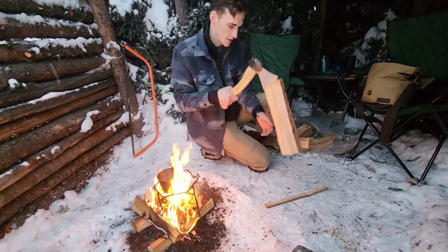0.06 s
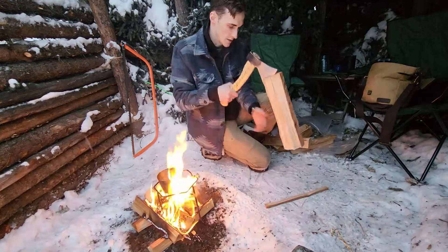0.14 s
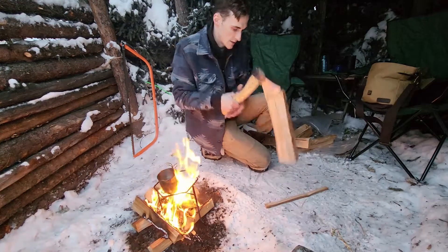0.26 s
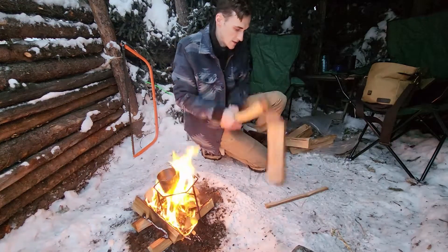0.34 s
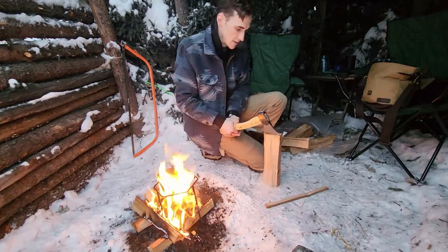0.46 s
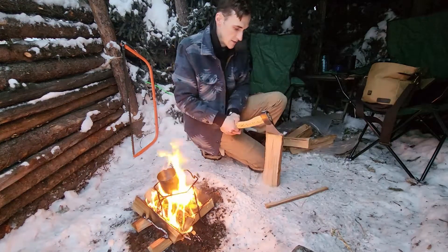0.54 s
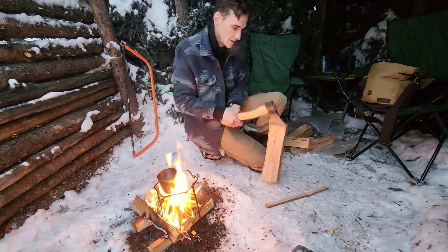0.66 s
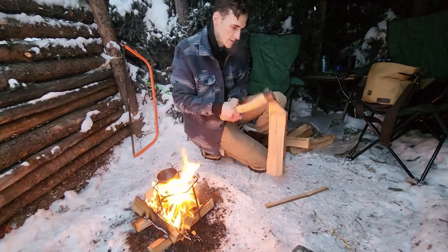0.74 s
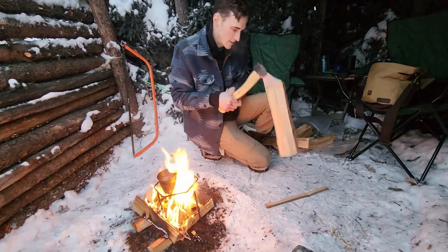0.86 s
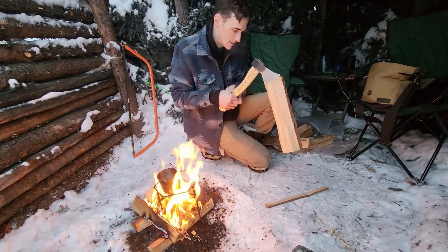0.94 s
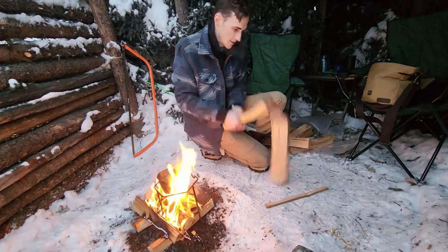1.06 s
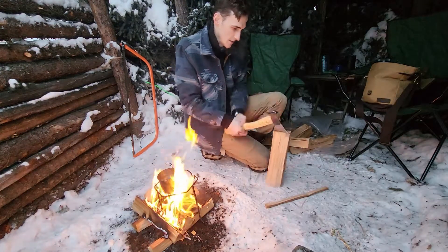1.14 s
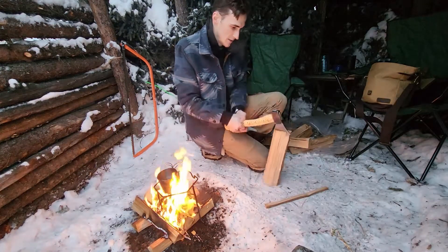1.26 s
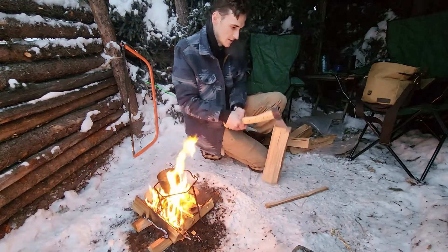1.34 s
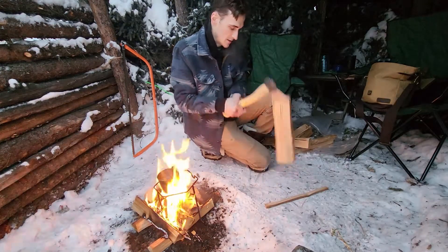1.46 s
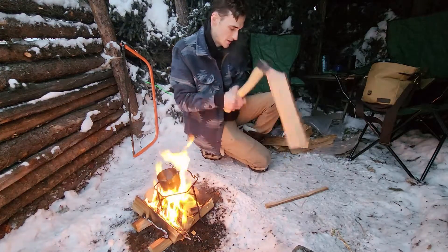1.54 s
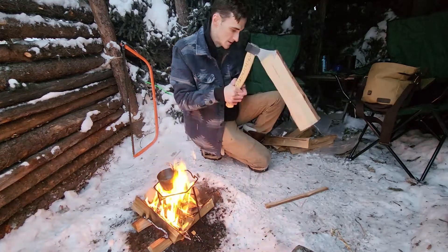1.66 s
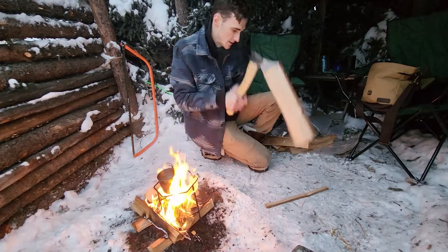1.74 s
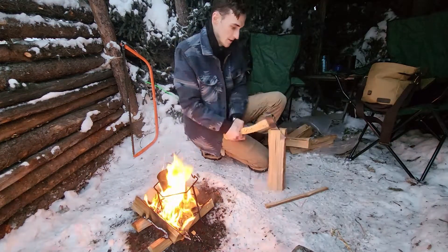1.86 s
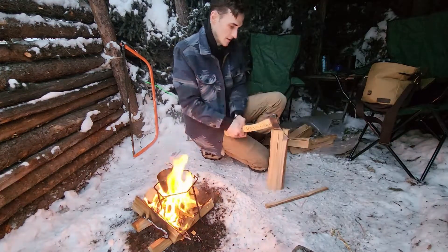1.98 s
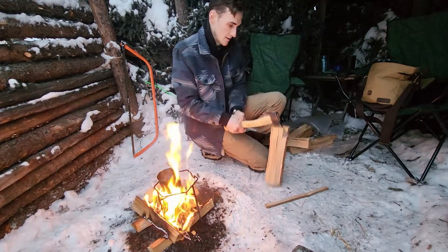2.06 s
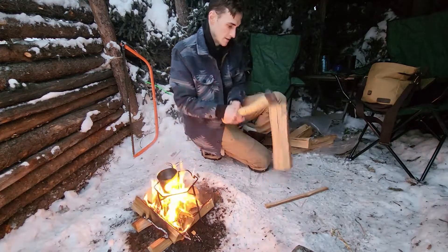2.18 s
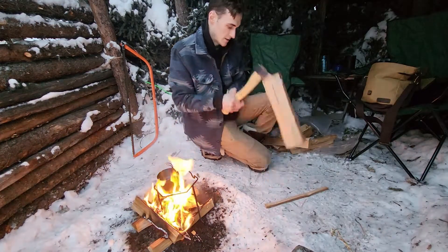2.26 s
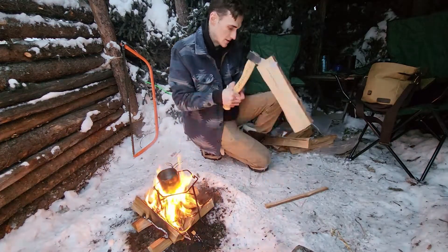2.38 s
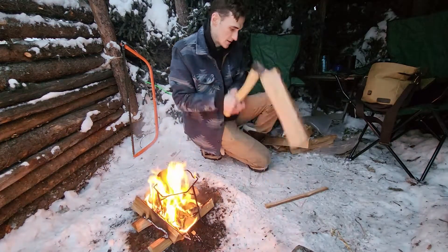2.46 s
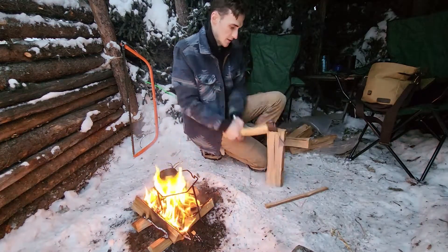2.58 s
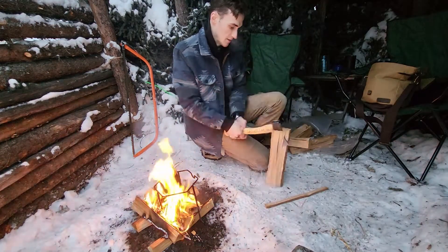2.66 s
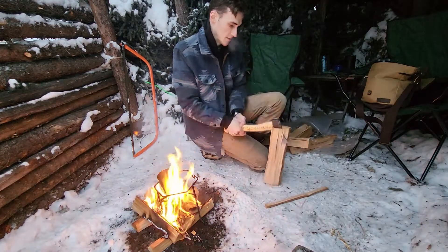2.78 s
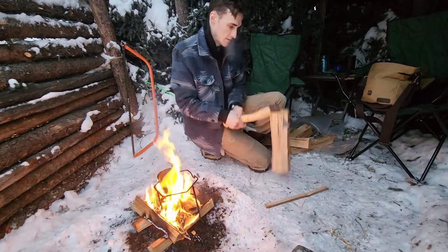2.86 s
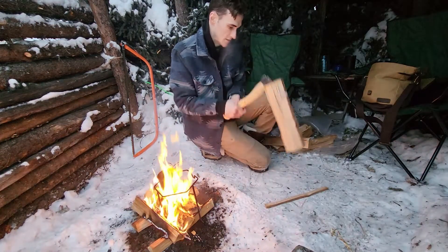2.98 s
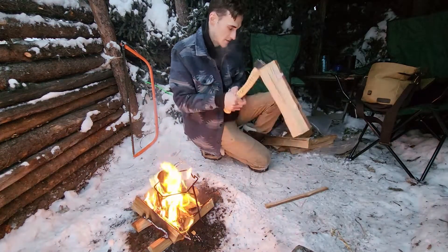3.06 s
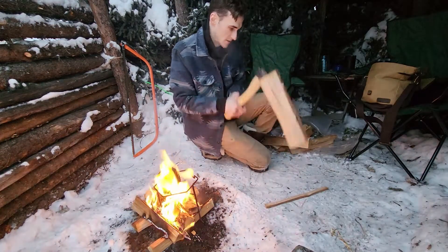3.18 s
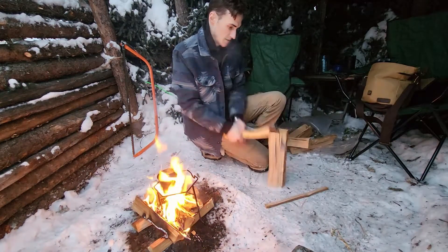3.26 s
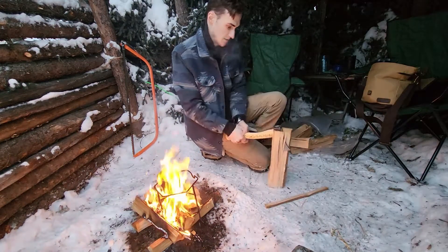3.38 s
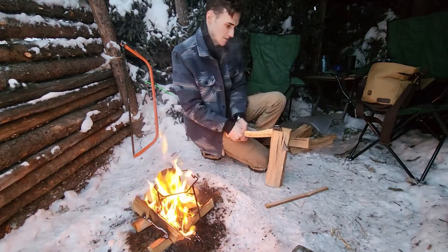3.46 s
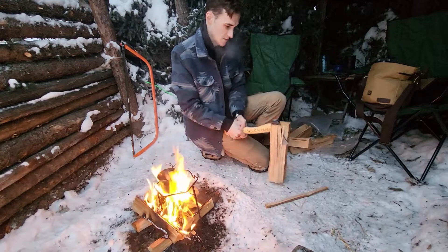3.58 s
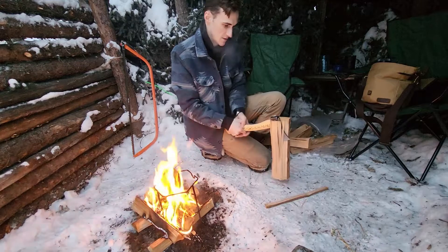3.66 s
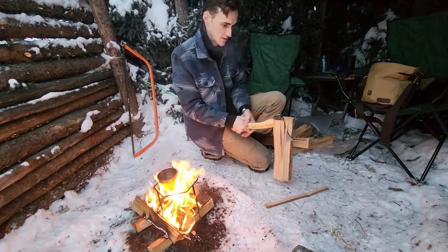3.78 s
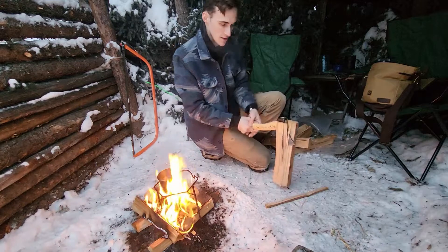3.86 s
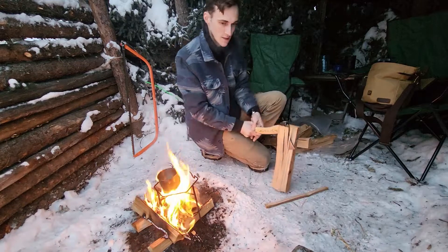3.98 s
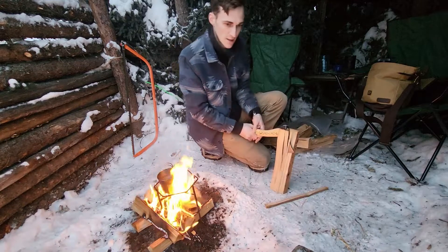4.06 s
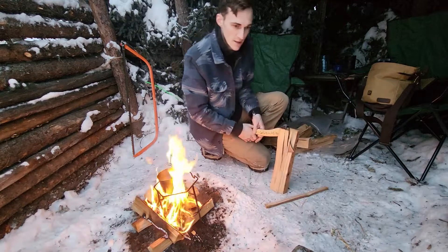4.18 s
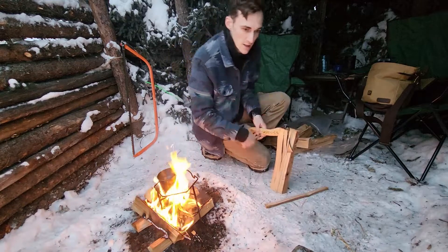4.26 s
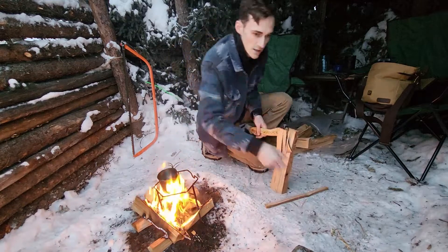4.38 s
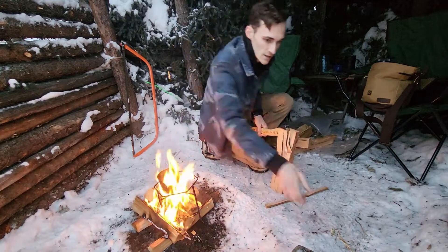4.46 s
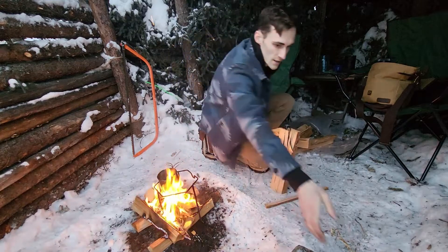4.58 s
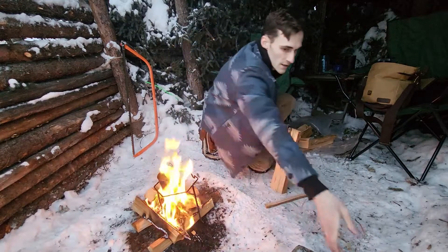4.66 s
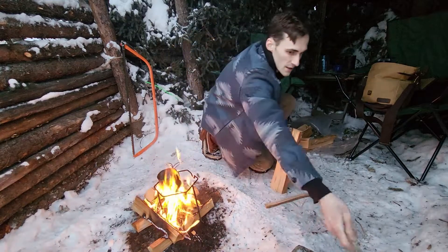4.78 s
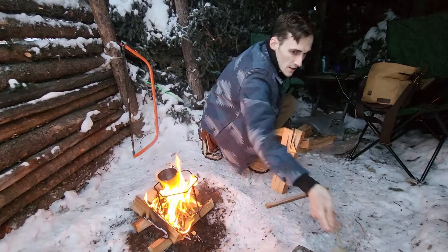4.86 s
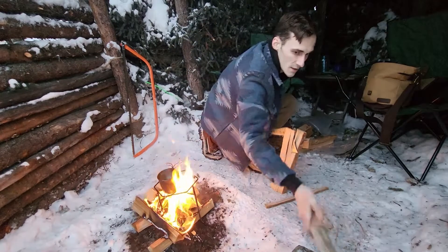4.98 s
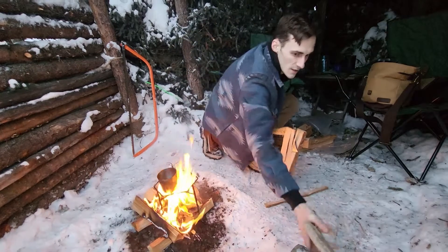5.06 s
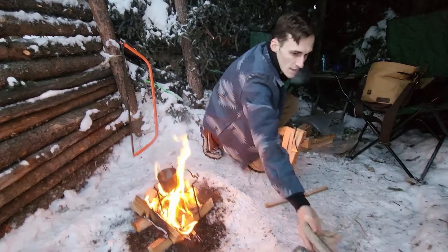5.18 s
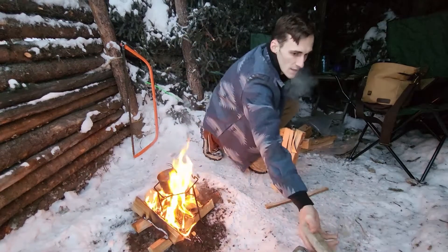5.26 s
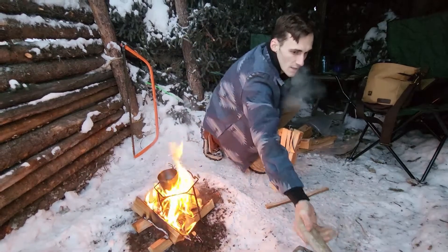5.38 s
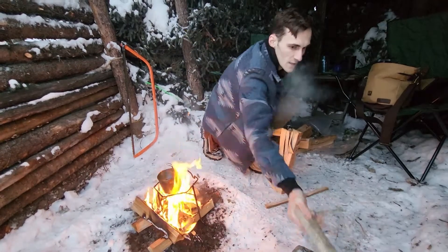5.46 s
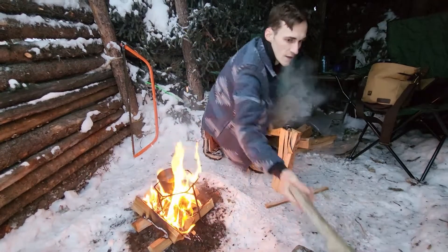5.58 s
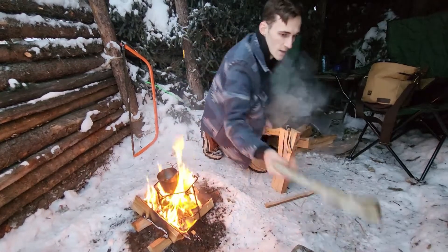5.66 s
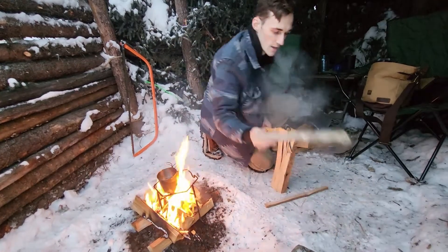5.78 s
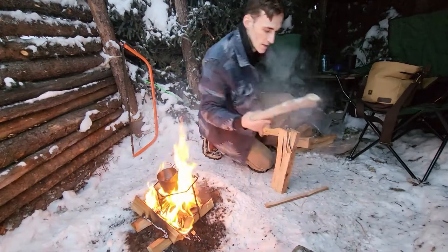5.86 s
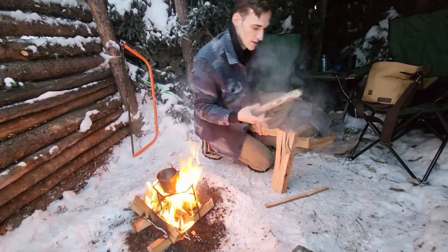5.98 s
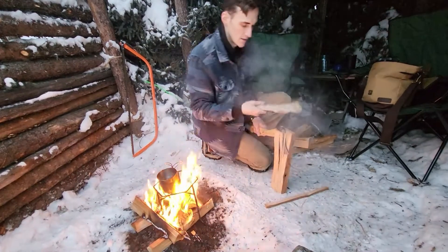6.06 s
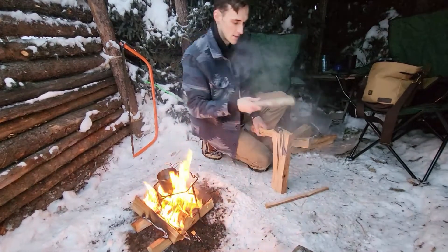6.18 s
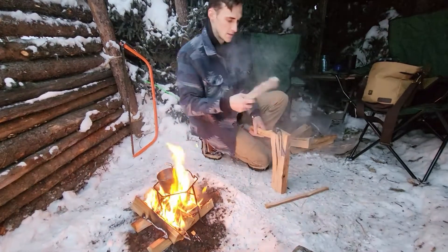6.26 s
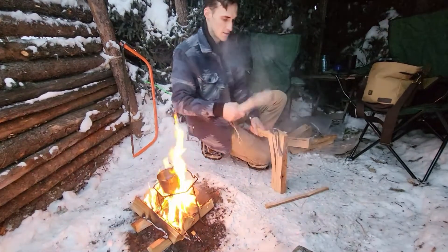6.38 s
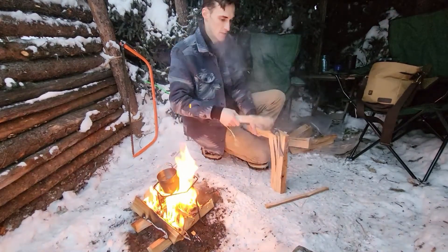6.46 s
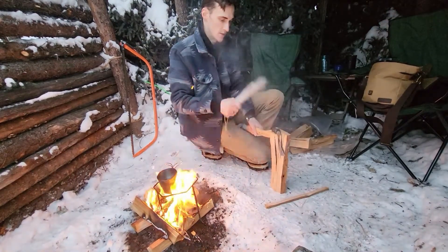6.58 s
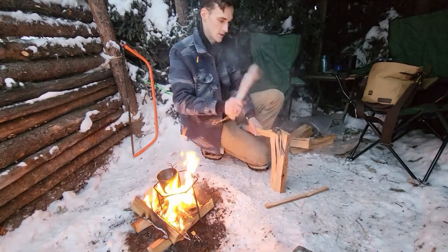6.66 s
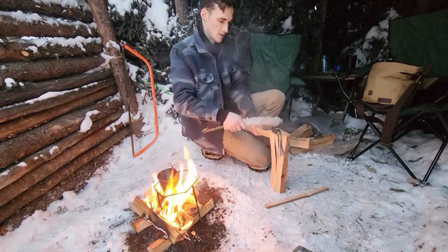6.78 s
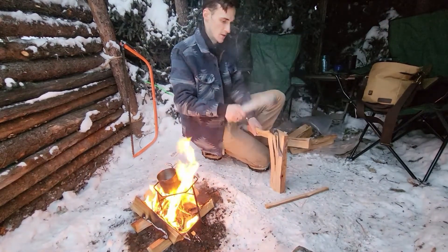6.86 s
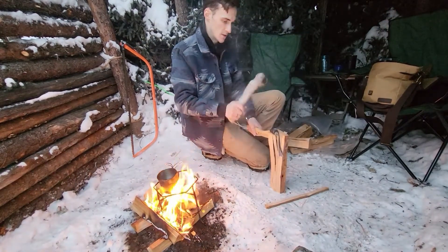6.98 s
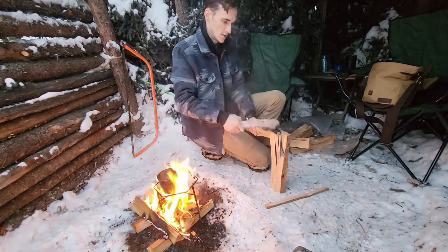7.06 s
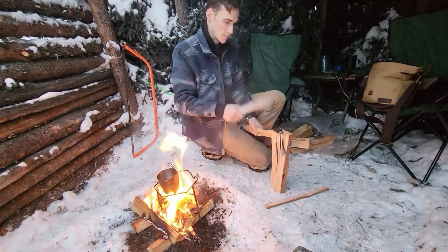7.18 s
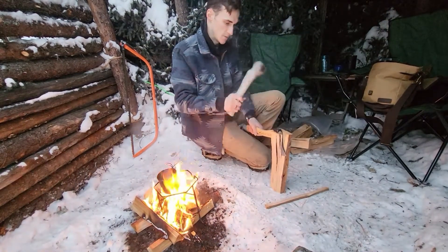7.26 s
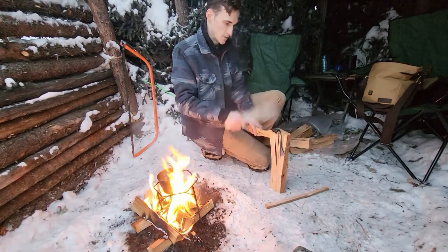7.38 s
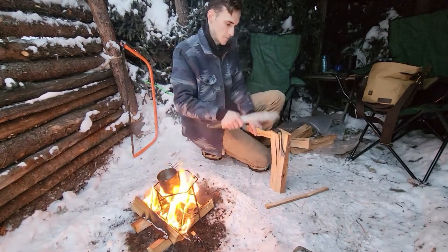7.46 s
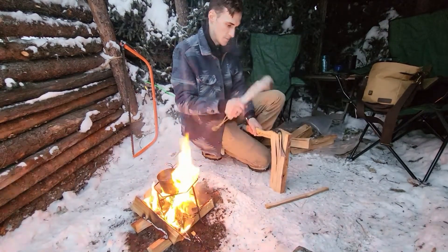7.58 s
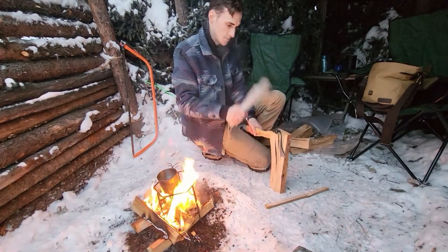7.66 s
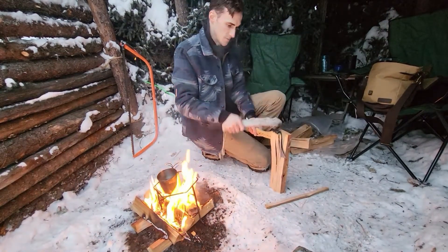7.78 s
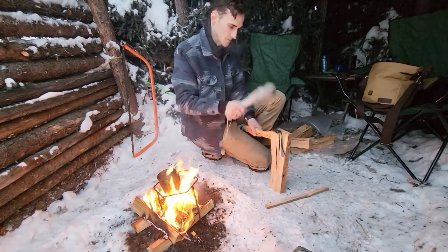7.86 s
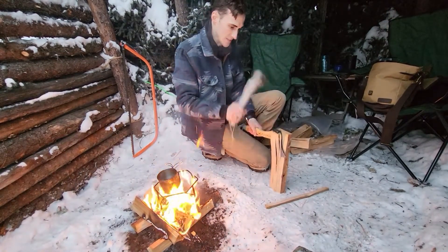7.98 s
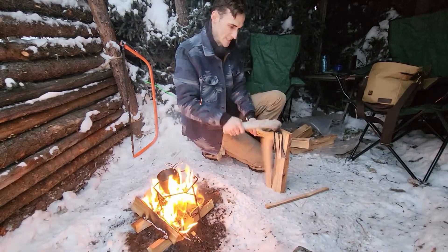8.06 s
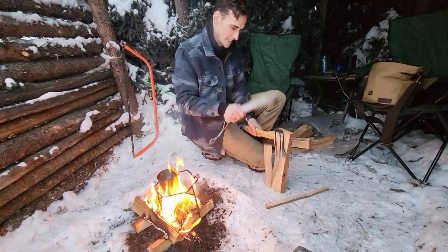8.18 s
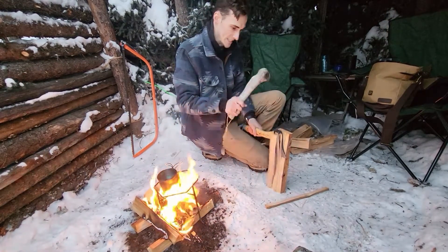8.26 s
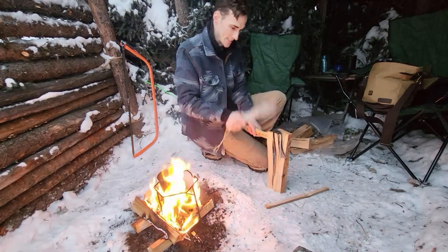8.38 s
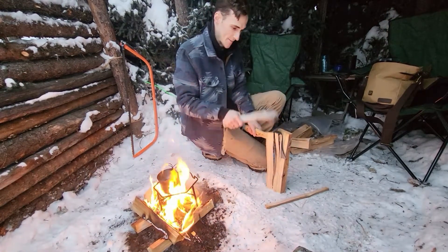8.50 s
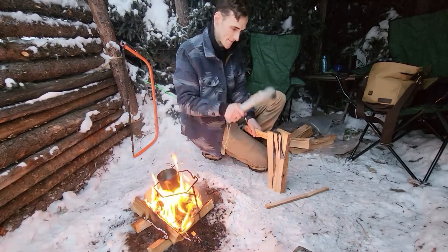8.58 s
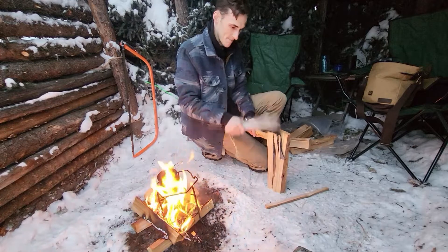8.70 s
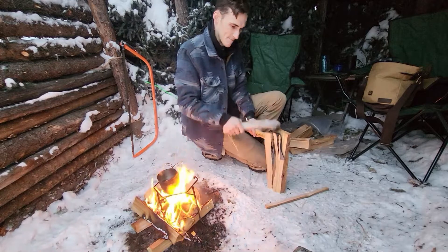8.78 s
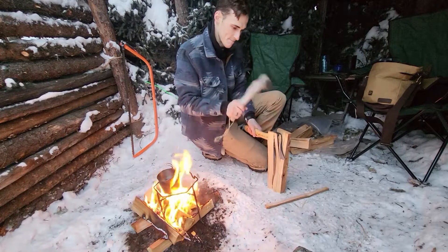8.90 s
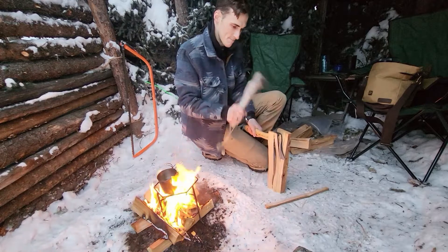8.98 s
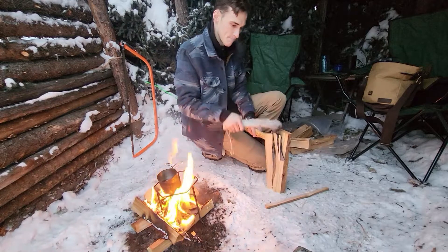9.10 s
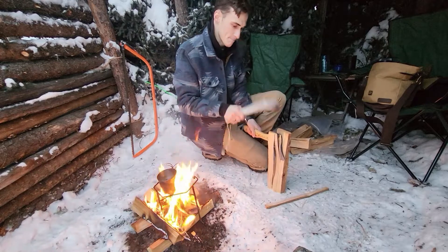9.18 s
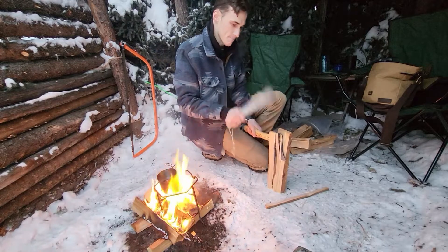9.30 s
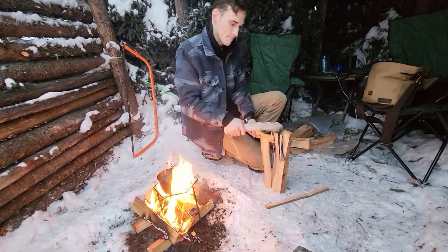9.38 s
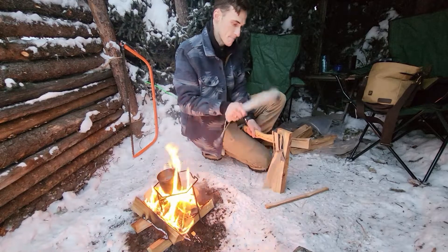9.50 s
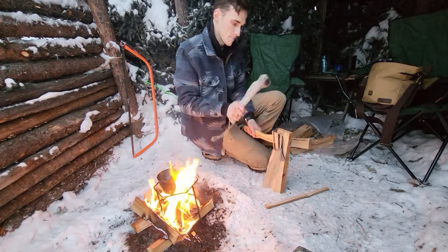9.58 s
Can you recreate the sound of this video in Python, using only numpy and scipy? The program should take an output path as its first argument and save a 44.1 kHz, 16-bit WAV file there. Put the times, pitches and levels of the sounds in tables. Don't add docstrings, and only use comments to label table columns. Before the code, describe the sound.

Five hard slams of a log on frozen ground and a softer set-down, a rummage in snow, then ten sharp wooden knocks splitting wood beside a fire.

```python
import sys
import numpy as np
from scipy import signal
from scipy.fft import rfft, irfft, next_fast_len
from scipy.io import wavfile
from scipy.ndimage import uniform_filter1d, map_coordinates

SR = 44100
rng = np.random.default_rng(int(sys.argv[2]) if len(sys.argv) > 2 else 0)


def amplitude_ratio(level_db):
    exponent = np.asarray(level_db, float) / 20
    return 10 ** exponent


def wrap_up_sound(samples):
    columns = np.atleast_2d(samples).T
    tamed = np.clip(columns, -1, 1)
    steps = np.round(tamed * 32767).astype(np.int16)
    wavfile.write(sys.argv[1], SR, steps)


N = 424683
SIZE = 2 ** 14
HZ, T = np.fft.rfftfreq(SIZE, 1 / SR), np.arange(SIZE) / SR
LEAD = 1024
LOCAL_WIDTH_HZ = 180
LOG_PAN_DB = 0.1

# start_s, level_db, crack_db, thud_db, swell_db
SLAMS = [
    (0.459, -6.5, -13.5, 1.5, -25),
    (1.189, -5, -15.5, -0.5, -17.5),
    (1.932, -4, -9.5, 2.5, -22),
    (2.662, -5.5, -9.5, 0.5, -21),
    (3.368, -5.5, -7.5, -2, -12.5),
    (4.149, -20, -4, -2.5, -43),
]
# brightest_hz, brightest_db, upper_db, second_db
SEATS = [(1540, -2.5, -3, -5), (1790, -7, -7.5, 1.5), (1940, -2.5, -0.5, -2), (1880, -3, -1, 1),
         (1840, -5.5, -2.5, -1.5), (1315, 3, 5.5, -1)]
# pitch_hz, width_hz, level_db
LOG_LOW = [(240, 90, -7), (430, 120, 7), (540, 110, -4.5)]
LOG_HIGH = [(1000, 170, -3.5), (1318, 150, -7.5), (2040, 260, -6.5), (2550, 180, -8), (3450, 67, -19.5)]
# pitch_hz, level_db (per Hz)
CRACK = [(1760, -34.5), (3000, -4), (3500, 0), (3890, 2), (5960, 0.5), (7400, 3.5), (8820, -18.5),
         (11800, -2), (16000, -22.5)]


def slams():
    highs = []
    for hz, seat_db, upper_db, second_db in SEATS:
        high = [(c, w, db + upper_db * (c > 2000)) for c, w, db in LOG_HIGH]
        highs.append(high + [(hz, LOCAL_WIDTH_HZ, seat_db), (654, 72, second_db)])
    return knocks(SLAMS, [LOG_LOW] * len(SLAMS), highs, CRACK, contact_s=.001,
                  trim_db=(-2.0, 3.5, 5.5, -3.0), grow_db=-0.42, tight_db=0.5)


# start_s, level_db, crack_db, thud_db, swell_db
BLOWS = [
    (6.5316, -12.5, -16, 8.5, -16),
    (6.8513, -8.5, -15.5, 3.5, -16),
    (7.1546, -9, -15.5, 1.5, -17.5),
    (7.4819, -7.5, -15.5, 2.5, -9.5),
    (7.8151, -8.5, -13.5, 1.5, -16),
    (8.1259, -6.5, -18.5, -2, -13),
    (8.4931, -9, -12.5, 0, -15.5),
    (8.8074, -9, -9, 1, -6.5),
    (9.1292, -8.5, -9, 2, -14.5),
    (9.4384, -10, -3, 1.5, -14),
]
# first_ring_db, second_ring_db, local_hz, local_db, upper_db
SPOTS = [(-3.5, -1, 1690, 4, -3.5), (3.5, 8, 1300, -2, 0.5), (2, -1, 1340, 0, -3),
         (-0.5, 1.5, 1389, 1.5, -0.5), (-1, 2, 1500, 0.5, 1), (4.5, 3.5, 1400, 6, 2),
         (2.5, 3, 1370, 3.5, 4.5), (4.5, 4.5, 1518, -0.5, 5.5), (3.5, 9, 1440, 2.5, 0),
         (-4, -3, 1670, -1.5, -3)]
# ring_hz, ring_db, whole_log_db, loose_half_db
HALVES = [(2155, -3.5, -7, -12), (2680, 2, -11, -16), (2230, 2, -6.5, -4), (2230, 1.5, -10.5, -5),
          (2200, 5.5, -10, -5), (2037, 6.5, -10.5, -4.5), (2217, 2.5, -14, -3), (2160, 7, -18.5, -1.5),
          (2736, -10, -12.5, 2), (2684, -0.5, -13, 0)]
# pitch_hz, width_hz, level_db
BATON_LOW = [(236, 44, -8.5), (708, 120, -11.5), (916, 74, -3.5)]
BATON_HIGH = [(1240, 300, -3.5), (2810, 210, -6), (3422, 220, -3.5), (4400, 510, -12)]
# pitch_hz, width_hz
RINGS = [(1945, 180), (2340, 160)]
# pitch_hz, width_hz
WHOLE = (390, 170)
LOOSE = (765, 49)
# pitch_hz, level_db (per Hz)
CLACK = [(2060, -26.5), (3500, -9.5), (5260, -10), (5970, -5), (6570, -12), (7800, -12.5), (8910, -38.5),
         (11600, -16.5), (16000, -28.5)]


def blows():
    lows, highs = [], []
    for spot, half in zip(SPOTS, HALVES):
        first_db, second_db, local_hz, local_db, upper_db = spot
        half_hz, half_db, whole_db, loose_db = half
        high = [(c, w, db + upper_db * (c > 3000)) for c, w, db in BATON_HIGH]
        high += [(*RINGS[0], first_db), (*RINGS[1], second_db)]
        high += [(local_hz, LOCAL_WIDTH_HZ, local_db), (half_hz, 150, half_db)]
        highs.append(high)
        lows.append(BATON_LOW + [(*WHOLE, whole_db), (*LOOSE, loose_db)])
    return knocks(BLOWS, lows, highs, CLACK, contact_s=.003,
                  trim_db=(-7.5, 8.5, 12.0, -14.5), grow_db=2.5, tight_db=-8)


# pitch_hz, width_hz, level_db
SLAP = (1700, 1700, 0)


def knocks(rows, lows, highs, bright, contact_s, trim_db, grow_db, tight_db):
    out = np.zeros((2, N + SIZE))
    sink = np.exp(-2j * np.pi * HZ * .0004)
    small = (1j * HZ / (170 + 1j * HZ)) ** 2 * sink
    bright, splinter = causal(bright), causal(SNAP)
    thud_trim, knock_trim, crack_trim, tear_trim = trim_db
    for k, (row, low, high) in enumerate(zip(rows, lows, highs)):
        s, db, crack_db, thud_db, swell_db = row
        body = small * modes(sorted(low), 1 + 0.005 * rng.standard_normal())
        thud = burst(0.02, body, db + thud_trim + thud_db, blow=6)
        knock = burst(0.005, modes(sorted(high)), db + knock_trim, blow=1.5, hold=contact_s)
        slap = burst(0.0069, modes([SLAP]), db - 12, blow=0.34)
        shelf = amplitude_ratio(tight_db * (k < 2) / (1 + (8500 / (HZ + 1)) ** 8))
        crack = burst(0.012, bright * shelf, db + crack_db + crack_trim, blow=0.27)
        tear_db = db + crack_db + tear_trim + grow_db * min(k, 5)
        tear = fibres(0.15, 430, splinter * shelf, tear_db)
        add(out, s, thud + knock + slap + crack + tear, .6, camp(near_db=-1), swell_db)
    return out[:, :N]


def fibres(t60, rate, response, db):
    ticks = (rng.random(SIZE) < rate / SR) * rng.exponential(1, SIZE)
    ticks = uniform_filter1d(ticks, size=70) + 0.0025
    hiss = ticks * rng.standard_normal(SIZE) * amplitude_ratio(-60 * T / t60)
    x = irfft(rfft(hiss) * response)
    return amplitude_ratio(db) * x / np.abs(x).max()


# start_s, level_db, body_db, pitch_hz
SPLINTERS = [(2.648, -30.5, 5.5, 7400), (3.336, -48, -22, 8780), (3.352, -33.5, -11.5, 5860),
             (4.149, -54, 8.5, 2380), (7.469, -33.5, -12.5, 5980), (7.7318, -33, -22.5, 3340),
             (8.110, -31, -1.5, 5040), (8.152, -14, 2.5, 6330), (8.159, -3.5, -9.5, 4360),
             (8.166, -7, -30.5, 2630), (8.174, -14, -11, 2700), (8.2051, -22, -9.5, 6200),
             (8.455, -44, -23, 2930), (9.111, -33.5, 5.5, 6100)]
# start_s, level_db, pitch_hz
CHIPS = [(4.3652, -54, 2050), (6.359, -59, 2350), (6.475, -58.5, 2130), (3.4457, -41, 3160),
         (3.5045, -49, 2000), (8.622, -47, 2700), (8.675, -50.5, 2630), (8.738, -52.5, 2550),
         (5.582, -36.5, 1880), (1.033, -52.5, 2860), (8.302, -43, 2750), (8.3529, -26.5, 2520),
         (8.6304, -34.5, 2690), (8.645, -48.5, 3000), (8.772, -45, 3000), (9.042, -52, 2550),
         (9.241, -51.5, 2520), (9.278, -40.5, 2650)]
# start_s, level_db
STRANDS = [(1.974, -41.5), (2.041, -46), (7.008, -50.5), (7.348, -39), (7.367, -42.5), (7.6927, -31),
           (7.9325, -48.5), (7.949, -43), (7.957, -35), (8.009, -35), (8.466, -34.5), (8.524, -29.5),
           (8.794, -32), (8.977, -52.5), (9.152, -26.5), (9.165, -45), (9.574, -49.5)]
# pitch_hz, level_db
CHIP = [(150, -9.5), (400, -8.5), (900, 4.5), (1800, 3.5), (3500, -34.5)]


def splitting(paths):
    chips = [(s, db, -1, hz) for s, db, hz in CHIPS]
    strands = [(s, db, -23.5, 7400) for s, db in STRANDS]
    return (clicks(SPLINTERS, paths, 0.019, CHIP, LOG_PAN_DB, ring_db=2.5, swell_db=-10.5)
            + clicks(chips, paths, 0.019, CHIP, LOG_PAN_DB, ring_db=18.0, swell_db=-3.0)
            + clicks(strands, paths, 0.016, CHIP, LOG_PAN_DB, ring_db=0, swell_db=-38.5))


# start_s, level_db, pitch_hz, t60_s
PINGS = [
    (0.662, -72, 3450, .05),
    (1.339, -58, 1930, .04),
    (6.6, -62, 3300, 0.3),
    (6.68, -62.5, 3370, .2),
]


def steel(path):
    out = np.zeros((2, N + SIZE))
    for s, db, hz, t60 in PINGS:
        add(out, s, burst(t60, modes([(hz, 80, 0)]) ** 2, db, blow=0.1), LOG_PAN_DB, path, swell_db=-33.5)
    return out[:, :N]


# start_s, level_db, pitch_hz
RATTLES = [(6.555, -55, 440), (7.015, -58.5, 1400), (7.053, -59.5, 1400), (7.088, -58.5, 1400),
           (7.822, -23.5, 900), (9.141, -43, 420), (8.81, -31, 260), (8.84, -35.5, 700), (7.308, -65, 1100),
           (8.9135, -52, 1480), (8.914, -56, 930), (8.9369, -53, 900), (9.001, -63.5, 1400),
           (9.137, -23, 1040), (9.2397, -51.5, 810), (9.2801, -58, 1060), (8.815, -30, 770),
           (8.351, -40.5, 950)]
# start_s, level_db, pitch_hz
SLIPS = [(4.236, -50, 532), (4.334, -52, 715), (4.451, -46, 688), (4.493, -54, 694), (4.555, -56, 721),
         (4.574, -50, 754), (4.598, -53, 710), (4.621, -45.5, 670), (4.652, -41, 690), (4.678, -55, 650),
         (4.703, -49, 696), (5.012, -31.5, 780), (5.036, -30.5, 800), (5.079, -45, 680), (5.312, -43, 794),
         (5.482, -50, 724), (5.509, -50, 730), (5.437, -55, 710), (5.52, -53, 725), (5.564, -46, 710),
         (4.915, -29, 1190), (4.935, -39.5, 1140),
         (5.998, -55, 420), (6.046, -56, 604), (6.062, -48.5, 460), (6.091, -47, 496), (6.134, -50, 650),
          (6.166, -48, 403), (6.219, -54, 503), (6.363, -43, 620), (6.421, -51.5, 417), (6.478, -45.5, 676),
          (6.624, -48, 630), (6.823, -45.5, 1170)]


def dull_grains(path):
    out = np.zeros((2, N + SIZE))
    for s, db, hz in SLIPS + RATTLES:
        grain = burst(0.008, modes([(hz, 220, 0)]) ** 2, db + 2.5, blow=1.5)
        add(out, s, grain, -2.5, path, swell_db=-40)
    return out[:, :N]


# start_s, level_db, pitch_hz
THUMPS = [(0.637, -52.5, 860), (4.744, -43, 223), (4.776, -52, 200), (4.94, -30, 283), (5.411, -38, 250),
          (5.575, -39, 214), (5.173, -20.5, 292), (5.224, -19.5, 263), (5.284, -24.5, 205),
          (5.04, -40, 110), (5.249, -38, 100), (4.961, -50, 240), (5.004, -45, 230), (5.303, -51, 220),
          (5.332, -39, 200), (5.513, -42, 220), (5.561, -35, 198), (7.153, -36, 185), (6.675, -41, 414),
          (7.841, -25, 450), (8.161, -24.5, 380), (8.837, -22, 405)]


def thumps(path):
    out = np.zeros((2, N + SIZE))
    for s, db, hz in THUMPS:
        thump = burst(0.037, modes([(hz, 150, 0), (3.1 * hz, 500, -8)]), db - 0.5, blow=0.72)
        add(out, s, thump, -2.5, path, swell_db=-40.0)
    return out[:, :N]


# start_s, level_db
REACH = [(4.1, -110.5), (4.2, -101.5), (4.33, -73), (4.55, -72.5), (4.65, -62), (4.725, -57), (4.745, -46),
         (4.79, -44), (4.82, -73)]
RUMMAGE = [(4.84, -67), (4.91, -44), (5.07, -39), (5.14, -57), (5.19, -42), (5.3, -57), (5.45, -55.5),
           (5.57, -60), (5.7, -99)]
LIFT = [(5.85, -145), (5.97, -64), (6.03, -61.5), (6.33, -59.5), (6.42, -57), (6.5, -58.5), (6.65, -74),
        (6.8, -61), (6.95, -84)]
# effort curve, crunch_db over effort, bump_db over effort
MOVES = [
    (REACH, -16, -36),
    (RUMMAGE, -11.5, 0.99),
    (LIFT, -16.5, -35.5),
]
# pitch_hz, level_db (per Hz)
RUB = [(88, -62), (150, -28.5), (230, 3.5), (566, -6), (667, -1), (959, -15), (1400, -9), (1690, -25.5),
       (2710, -25), (3000, -43.5), (3900, -60), (6600, -120)]
CRUNCH = [(710, -40.5), (1200, -14.5), (1720, 3.5), (1910, 3.5), (2230, -1.5), (3510, -5.5), (7490, -12),
          (9110, -29), (16000, -24.5)]
BUMP = [(25, -21), (60, 11), (110, 6.5), (220, -7), (400, -53.5)]


def groping():
    out, start, n = np.zeros((2, N)), 4 * SR, 3 * SR
    gains = 0
    for effort, crunch_db, bump_db in MOVES:
        effort_db = curves(effort)[0][start:start + n]
        gains = gains + amplitude_ratio(effort_db + np.c_[[0, crunch_db, bump_db]])
    rub_gain, crunch_gain, bump_gain = gains
    rub = rush(RUB, patchy_db=1.5, source=amplitude_ratio(3 * wobble(150, n) + 2.6 * wobble(36, n)))
    crunch = rush(CRUNCH, patchy_db=0.5, source=amplitude_ratio(4 * wobble(250, n) + 3.5 * wobble(60, n)))
    bump = rush(BUMP, patchy_db=1.5, source=amplitude_ratio(2.2 * wobble(30, n)))
    bump_gain = np.roll(uniform_filter1d(bump_gain, round(.16 * SR)), round(.08 * SR))
    moved = rub_gain * rub + amplitude_ratio(3.5) * crunch_gain * crunch + bump_gain * bump
    out[:, start:start + n] = moved * amplitude_ratio([[-1.5], [1.5]])
    return out


# start_s, level_db, body_db, pitch_hz
SNAPS = [(4.452, -65, 13, 2600), (4.8693, -68, 28, 1250), (4.8907, -46, 20, 3600), (4.8974, -42, -5, 7250),
         (4.9104, -30, 2, 2520), (4.9237, -28.5, 2.5, 1930), (4.9586, -36, -3, 1980),
         (4.9651, -30.5, -15, 3530), (4.9941, -30, 10.5, 4080), (5.0106, -38, 0, 3430),
         (5.018, -37, -9, 3000), (5.0509, -31, 1.5, 1980), (5.073, -37, -2, 2000), (5.109, -46.5, 10, 2450),
         (5.1703, -34.5, 6, 2340), (5.2165, -35.5, 13, 2050), (5.23, -35.5, 4.5, 2130),
         (5.2524, -36.5, -14, 6300), (5.308, -63, -5.5, 6960), (5.3248, -51.5, 12, 2410),
         (5.3502, -43.5, -7, 3450), (5.395, -17, -12, 6580), (5.437, -49, -4, 2000), (5.4819, -75, 5, 1910),
         (5.5373, -65, 15, 2004), (5.5596, -51, 13, 7640), (5.5788, -29.5, 3, 3330)]
# pitch_hz, level_db
STICK = [(60, -57), (200, 18.5), (450, -33), (1100, 9.5), (2500, -28.5)]


def hand_snaps(paths):
    return clicks(SNAPS, paths, .015, STICK, pan_db=-3.5, ring_db=11, swell_db=-24)


# start_s, level_db, body_db, pitch_hz
POPS = [(0.3965, -44, 9.5, 2826), (0.846, -58, -30, 7550), (1.0303, -37.5, -12, 1950),
        (1.4453, -54.5, -14, 2750), (1.529, -46.5, -31, 2740), (1.5998, -49, -27, 4530),
        (2.8485, -17, -12, 2530), (2.849, -17, -39, 9300), (3.19, -14.5, -42, 9380),
        (2.868, -31.5, -10, 4250), (2.9165, -29.5, -11, 3710), (3.1895, -14, -13.5, 4400),
        (3.236, -46, -40, 4800), (3.25, -42.5, -27.5, 5670), (3.591, -54.5, -28, 3300),
        (3.7044, -45, -21, 2690), (3.8487, -37, -23, 3300)]
# start_s, level_db
EMBERS = [(0.939, -53.5), (1.068, -61), (1.234, -42), (2.55, -56), (2.95, -55), (3.056, -59),
          (2.306, -56.5), (2.483, -49), (2.7847, -37.5), (2.899, -40), (3.022, -54), (3.046, -60),
          (3.6724, -52.5), (3.7585, -64), (3.7879, -62), (3.831, -55), (3.9401, -55), (2.906, -43),
          (3.611, -55), (3.8052, -48), (3.908, -45.5), (3.954, -47.5), (3.989, -49.5), (4.1076, -52),
          (4.385, -50), (4.466, -53), (5.242, -39), (5.367, -30.5), (5.728, -51.5)]


def fire_pops(paths):
    embers = [(s, db, -29.5, 8000) for s, db in EMBERS]
    return clicks(POPS + embers, paths, 0.007, CHIP, pan_db=-1, ring_db=12, swell_db=-23.0,
                  hold=.0024, rise=.0013)


# pitch_hz, level_db (per Hz)
SNAP = [(880, -36), (1500, -10.5), (2160, -11.5), (2860, -8.5), (4730, -6), (5280, -5), (7540, -10),
        (8490, -21.5), (11500, -8.5), (16000, -14.5)]
# pitch_hz, width_hz, level_db
PORT = (7550, 500, -7)


def clicks(rows, paths, t60, body, pan_db, ring_db, swell_db, hold=.0003, rise=.0003):
    out, bright, body = np.zeros((2, N + SIZE)), causal(SNAP), causal(body)
    for k, (s, db, body_db, hz) in enumerate(rows):
        ring = 1 + amplitude_ratio(ring_db) * modes([(hz, 260, 0), (2.1 * hz, 400, -1.5), PORT])
        snap = burst(t60, bright * ring, db + 3.0, blow=0.05, hold=hold, rise=rise)
        dull = burst(0.8 * t60, body, db + body_db - 4.0, blow=0.2, hold=hold, rise=rise)
        pan = pan_db - 3 * rng.standard_normal()
        add(out, s, snap + dull, pan, paths[k % len(paths)], swell_db)
    return out[:, :N]


# start_s, level_db
JOLTS = [
    (.46, -48.5),
    (2.663, -52),
    (3.37, -51),
    (4.149, -45),
    (8.158, -40),
]


def jolts():
    out = np.zeros((2, N + SIZE))
    for s, db in JOLTS:
        jolt = burst(.03, modes([(45, 40, 0)]) ** 2, db)
        add(out, s, jolt, 0, np.ones((2, 1)), swell_db=-40)
    return out[:, :N]


# start_s, level_db
FIRE = [(0, -60.5), (1, -62), (1.9, -64.5), (3.8, -67), (6.3, -64), (9.63, -67)]
# pitch_hz, level_db (per Hz)
FLAME = [(12, -40), (20, -1.5), (38, -8.5), (59, 2.5), (155, -11), (247, -21.5), (300, -40), (390, -69),
         (660, -120)]
HISS = [(120, -38), (200, 1.5), (299, -6.5), (360, 2.5), (548, -14.5), (659, -8.5), (791, -22.5),
        (1300, -11.5), (2090, -17.5), (2470, -25.5), (5230, -27.5), (7270, -22), (8740, -35.5),
        (13300, -29.5), (16000, -28.5)]


def fire():
    flame_db, = curves(FIRE)
    hiss_db = -69.5 + 0.65 * (flame_db - flame_db.mean())
    flame = rush(FLAME, patchy_db=2.0, source=amplitude_ratio(1.0 * wobble(2.5)))
    hiss = rush(HISS, patchy_db=2.1, source=np.ones(N))
    return amplitude_ratio(flame_db + 4.0) * flame + amplitude_ratio(hiss_db) * hiss


# pitch_hz, likeness (0 to 1)
ALIKE = [(30, 0.49), (90, 1), (180, 0.85), (400, 0.32), (1000, 0.063), (3000, 0.15), (9000, 0.14)]


def rush(spectrum, patchy_db, source):
    n = len(source)
    z = signal.stft(rng.standard_normal((2, n)) * source, nperseg=512)[2]
    field = uniform_filter1d(rng.standard_normal(z.shape[1:]), size=6, axis=0)
    field = uniform_filter1d(field, size=10, axis=1)
    pair = signal.istft(z * amplitude_ratio(patchy_db * unit(field)), nperseg=512)[1][:, :n]
    m = next_fast_len(n + SIZE)
    hz = np.fft.rfftfreq(m, 1 / SR)
    turn = np.arccos(np.clip(along(ALIKE, hz), -1, 1)) / 2
    spread = amplitude_ratio(along(spectrum, hz)) * [np.cos(turn), np.sin(turn)]
    mid, side = irfft(rfft(pair, m) * spread, m)[:, :n]
    return unit(np.array([np.roll(mid + side, shift=4), mid - side]))


# pitch_hz, lag (samples)
LAG = [(60, 0.46), (400, 11), (1000, 12.24), (2200, 3.29), (12000, 5.5)]
# pitch_hz, t60_s
NEAR = [(300, 0.093), (1500, 0.058), (5000, 0.029), (12000, 0.035)]
FOREST = [(300, 0.071), (2000, 0.026), (8000, 0.4)]
FAR = [(300, 0.18), (3000, 0.18)]
# pitch_hz, level_db
TRUNKS = [(300, -32.5), (2000, -33), (5000, -34), (12000, -30)]
# delay_s, level_db, top_hz
WALLS = [(.046, -33.5, 13530), (0.058, -32.5, 4978), (0.0594, -22.5, 784.5), (.072, -32, 900),
         (.132, -52, 3000), (0.179, -56, 1251)]
# pitch_hz, level_db
WALL_TONE = [(250, -8.5), (470, 1.5), (800, -2), (1400, 3), (2000, -5.5), (3000, 1), (8000, 3)]
# delay_s, level_db
EARLY = [(.0069, 0.14), (.0163, -17), (.0233, -13.5), (.0302, -23.5)]
# pitch_hz, width_hz, level_db
PILE = [(460, 270, -4.15), (886, 75, -7.5)]


def camp(near_db=-3):
    direct = np.exp(-1j * np.pi * HZ / SR * along(LAG, HZ) * [[1], [-1]])
    obstacles = HZ ** 2 / (HZ ** 2 + 420 ** 2)
    near = even(direct + amplitude_ratio(near_db) * tail(NEAR) * obstacles, size=40)
    near = rfft(irfft(near) * ((T < T.mean()) | (T > T[-16])))
    walls = causal(WALL_TONE) * echoes(WALLS)
    hollows = sum(amplitude_ratio(db) * 1j * HZ * w / (c * c - HZ ** 2 + 1j * HZ * w) for c, w, db in PILE)
    pile = hollows * sum(amplitude_ratio(db) * delay(s) for s, db in EARLY)
    forest = amplitude_ratio(along(TRUNKS, HZ)) * delay(0.055) * tail(FOREST)
    far = amplitude_ratio(-42.5) * delay(.08) / (1 + (HZ / 3000) ** 4) * tail(FAR)
    return near * (1 + walls) + direct * pile + forest + far


def echoes(table):
    return sum(amplitude_ratio(db) * delay(s) / (1 + 1j * HZ / top_hz) ** 2 for s, db, top_hz in table)


def delay(s):
    return np.exp(-2j * np.pi * HZ * s)


def tail(decay):
    hz, t, z = signal.stft(rng.standard_normal((2, SIZE)), SR, nperseg=128)
    fade = amplitude_ratio(-60 * t / along(decay, hz)[:, None])
    return even(rfft(signal.istft(z * fade, SR, nperseg=128)[1][:, :SIZE]))


def add(out, s, x, pan_db, path, swell_db):
    swell = rng.standard_normal((2, SIZE)) * amplitude_ratio(-700 * np.abs(T - LEAD / SR))
    swell = swell * np.sin(np.pi / 2 * np.minimum(T * SR / LEAD, 2))
    onset = delay(LEAD / SR) + amplitude_ratio(swell_db) * even(rfft(swell))
    spot = out[:, round(s * SR) - LEAD:][:, :SIZE]
    spot += amplitude_ratio([[pan_db / 2], [-pan_db / 2]]) * irfft(rfft(x) * path * onset)


def burst(t60, response, db, blow=3, hold=0, rise=1e-5):
    fade = amplitude_ratio(-60 * np.maximum(T - hold, 0) / t60)
    push = rng.standard_normal(SIZE) * fade * np.minimum(T / rise, 1)
    push[0] = -blow * np.sqrt(t60 * SR / np.log(1e6))
    x = irfft(even(rfft(push)) * response)
    x[-LEAD:] = 0
    return amplitude_ratio(db) * x / np.abs(x).max()


def modes(table, stretch=1, scatter_db=-1.0):
    total = 0
    for k, (c, w, db) in enumerate(table):
        strength = (-1) ** k * amplitude_ratio(db + scatter_db * rng.standard_normal())
        total = total + strength * 1j * HZ * w / ((c * stretch) ** 2 - HZ ** 2 + 1j * HZ * w)
    return total


def causal(spectrum):
    c = irfft(np.log(amplitude_ratio(along(spectrum, HZ)) + 1e-6))
    c[1:SIZE // 2] *= 2
    c[SIZE // 2 + 1:] = 0
    return np.exp(rfft(c))


def even(z, size=70):
    return z / np.sqrt(np.abs(uniform_filter1d(np.abs(z) ** 2, size=size)) + 1e-12)


def unit(x):
    return x / np.sqrt(np.mean(x ** 2) + 1e-20)


def along(points, hz):
    f, v = np.transpose(points)[:2]
    return np.interp(np.log(hz + 1), np.log(f + 1), v)


def curves(rows):
    s, *cols = np.transpose(rows)
    return [np.interp(np.arange(N) / SR, s, c) for c in cols]


def wobble(rate, n=N):
    return map_coordinates(rng.standard_normal(int(n * rate / SR) + 4), [np.arange(n) * rate / SR])


def scene():
    paths = [camp() for _ in range(6)]
    wood = slams() + blows() + splitting(paths) + steel(paths[0])
    hand = dull_grains(paths[1]) + thumps(paths[1]) + groping() + hand_snaps(paths)
    return wood + hand + fire_pops(paths) + jolts() + fire()


def roll_off(x):
    return signal.sosfilt(signal.butter(12, 17130, fs=SR, output="sos"), x)


# pitch_hz, level_db
TOP = [(15700, 1), (16100, -20.5), (16800, -26.5), (17200, -61)]


def record(dry):
    soft = dry / (1 + np.abs(dry / .83) ** 6) ** (1 / 6)
    m = next_fast_len(N + SIZE)
    limit = amplitude_ratio(along(TOP, np.fft.rfftfreq(m, 1 / SR)))
    mix = irfft(rfft(soft, m) * limit, m)[:, :N]
    return roll_off(mix)


dry = scene()
out = record(dry)
wrap_up_sound(out)
```